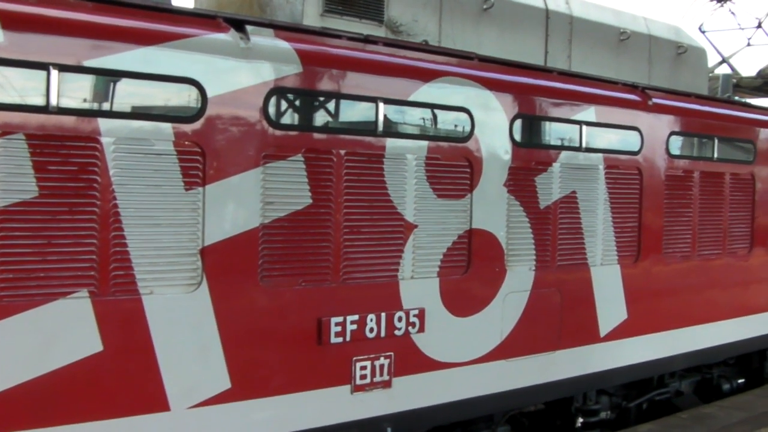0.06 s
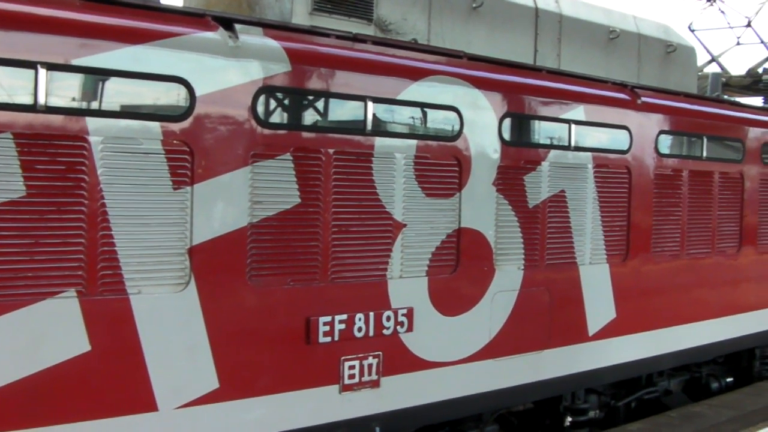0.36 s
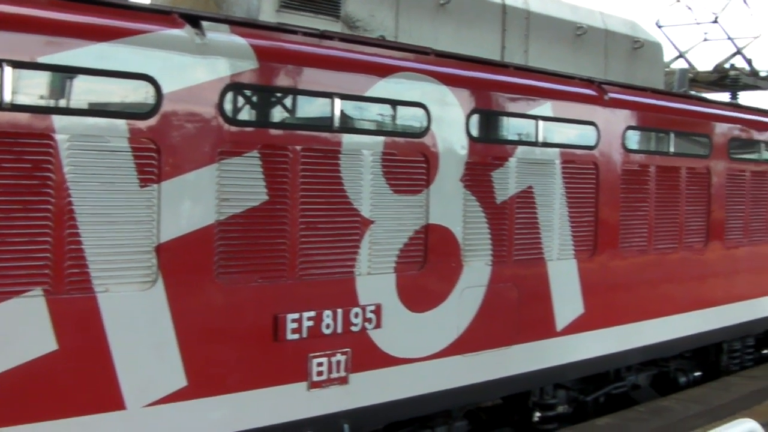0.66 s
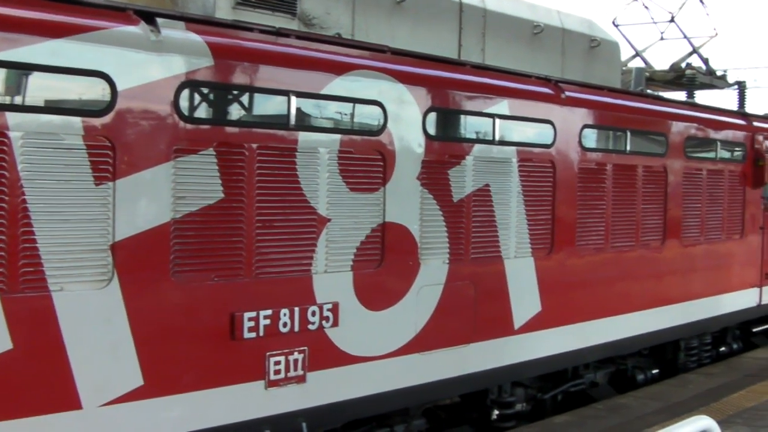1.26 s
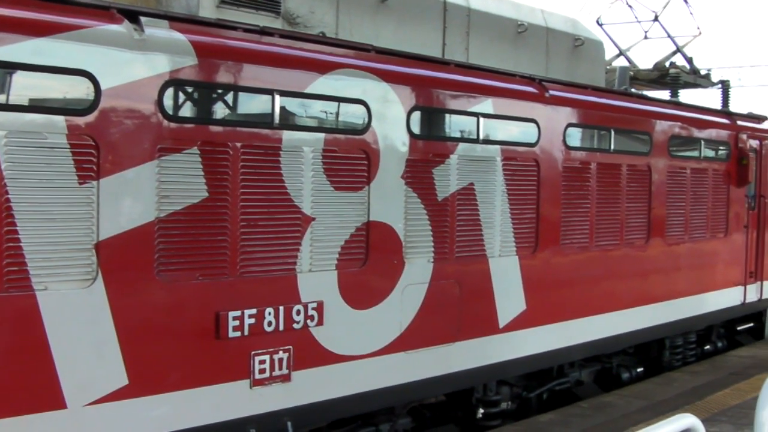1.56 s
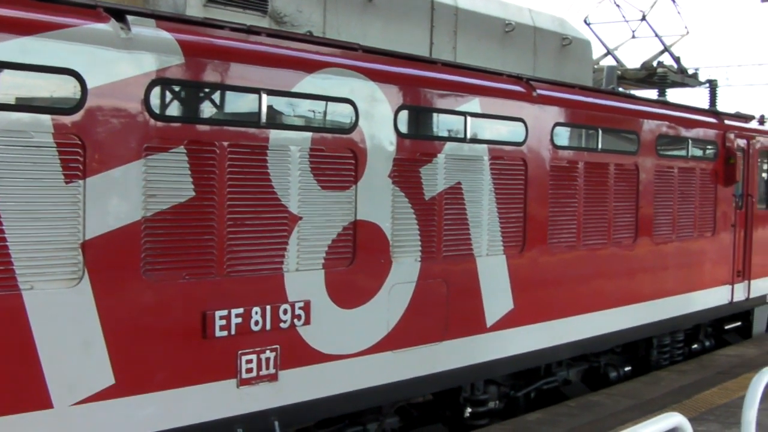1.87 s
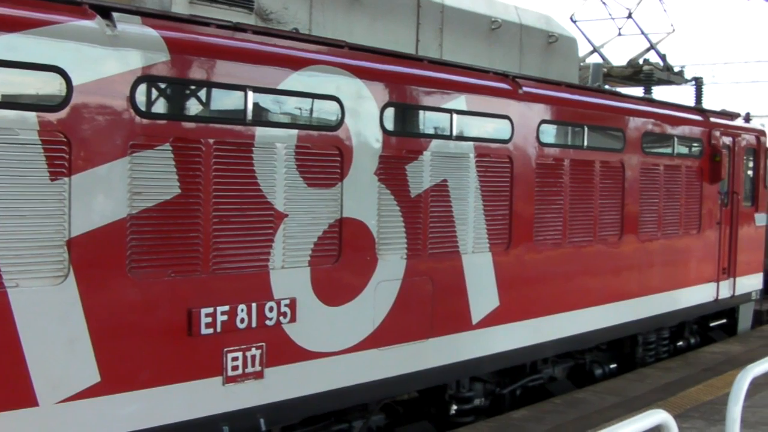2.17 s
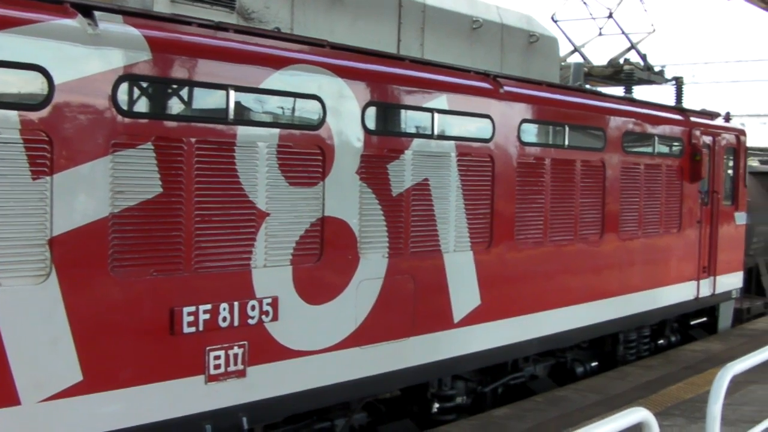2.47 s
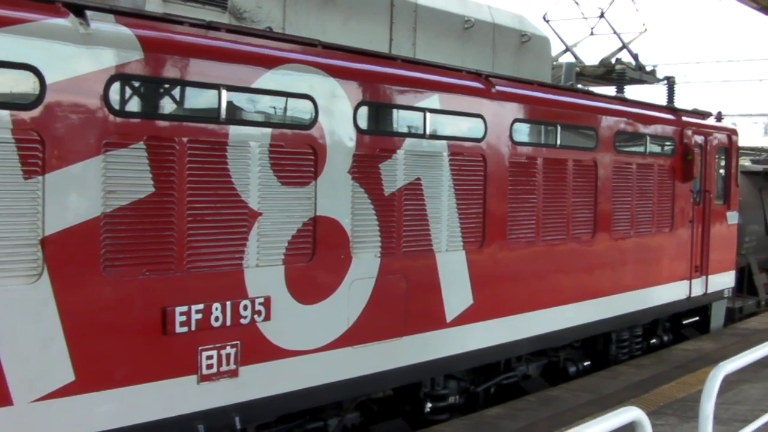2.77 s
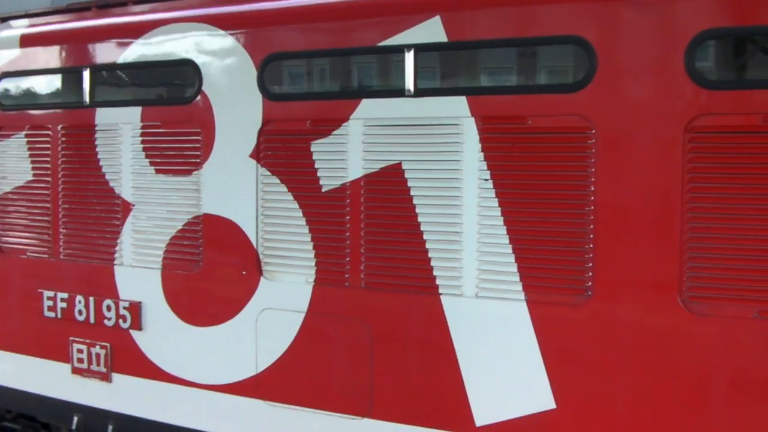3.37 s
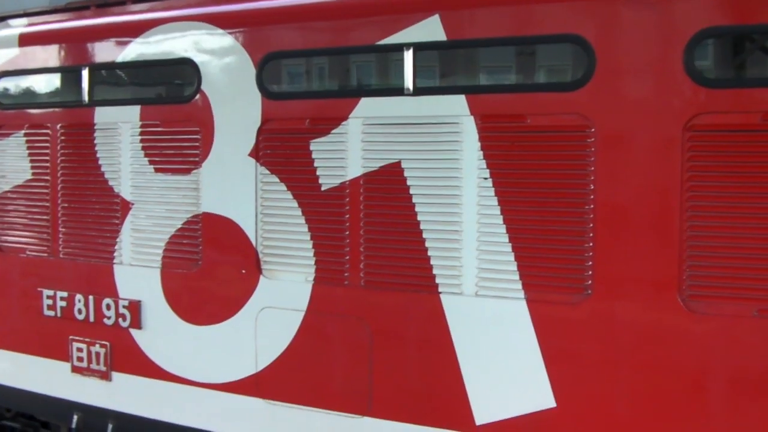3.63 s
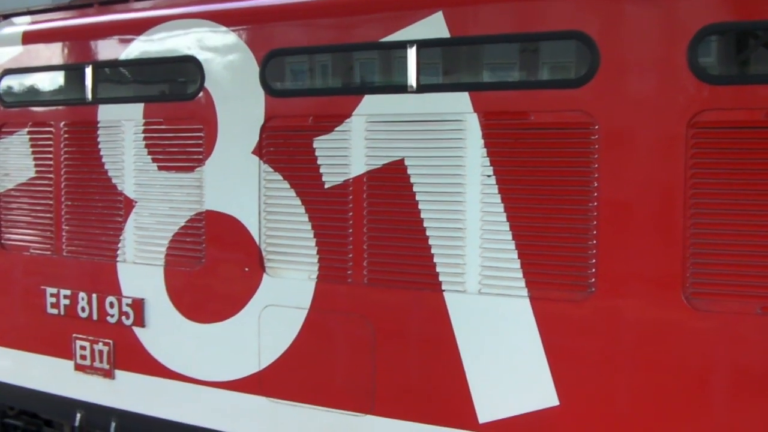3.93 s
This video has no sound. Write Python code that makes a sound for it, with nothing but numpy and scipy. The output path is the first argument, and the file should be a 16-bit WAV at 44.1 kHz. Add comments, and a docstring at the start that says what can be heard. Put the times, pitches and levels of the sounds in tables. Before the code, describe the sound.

A standing electric locomotive's cooling fans hum and rush, with one short hiss of air.

```python
"""At a station platform, an electric locomotive stands with its cooling blowers running.
The fans hum on a few tones. Their air rushes through ringing ducts and louvres (slatted vents)
and swells gently about twice a second. Compressed air hisses once from a valve. The sound drops
out for an instant and resumes nearer the louvres, with less hum and more rush."""
import sys
import numpy as np
from scipy.fft import rfft, irfft
from scipy.io import wavfile

SR = 44100
rng = np.random.default_rng(int(sys.argv[2]) if len(sys.argv) > 2 else 0)


def to_wav(s):
    """Save 16-bit WAV."""
    ch = np.atleast_2d(s).T  # columns
    pcm = np.round(np.clip(ch, -1, 1) * 32767)  # PCM
    wavfile.write(sys.argv[1], SR, pcm.astype(np.int16))


N = 176400
T = np.arange(N) / SR
HZ = np.maximum(np.arange(N // 2 + 1) * SR / N, 1)
PLATFORM, LOUVRES = 0, 1   # the two listening places

# How alike the two ears hear moving air, from 1 (the same) to -1 (opposite):
# (frequency [Hz], likeness on the platform [-1 to 1], likeness at the louvres [-1 to 1])
EAR_LIKENESS = [(40, 0.9, 0.96), (350, 0.98, 0.97), (1000, 0.95, .97), (2100, 0.9, 0.91),
                (3500, 0.71, 0.65), (5000, .52, .33), (7000, 0.22, -.05), (12000, .02, -0.71)]


def blower_hum(place):
    """Spinning fans and motors hum: one main tone, which wavers on the platform, and several others."""
    # The main tone as heard on the platform: (time [s], level [dB])
    main_levels = [(0.0, -15.5), (0.02, -10.5), (0.17, -16), (0.44, -10), (0.72, -14.5), (1.07, -10.5),
                   (1.26, -16.5), (1.48, -10.5), (1.84, -14.5), (2.04, -11), (2.42, -14), (2.77, -10.5),
                   (2.83, -15.5), (2.94, -14.5), (2.98, -17.5), (3.03, -12)]
    # The other tones: (pitch [Hz], platform level [dB], louvre level [dB], flutter [share of the tone])
    other_tones = [(86.2, -48, -45, 0.45), (172.3, -42.5, -45, 0.63), (598.8, -23.5, -23.5, .11),
                   (753.6, -25.5, -33, .14), (768.5, -38, -30, 0.89), (1157, -40.5, -35, .7),
                   (1510, -41.5, -48, .5), (1898, -42, -39, 0.69), (3280, -52, -46, 0.45)]
    seconds, level_db = np.transpose(main_levels)
    main_db = np.interp(T, seconds, level_db) if place == PLATFORM else -22.5
    hum = from_db(main_db) * wavering_tone(hz=377, flutter=0.043)
    for hz, *levels_db, flutter in other_tones:
        hum += from_db(levels_db[place]) * wavering_tone(hz, flutter)
    return hum


def air_rush(place):
    """Swirling air makes the ducts ring; its octaves swell together and each flickers on its own."""
    # The rushing air: (frequency [Hz], platform level [dB per Hz], louvre level [dB per Hz])
    rush_levels = [(22, -80.5, -82), (40, -73.5, -70), (79.6, -56, -54.5), (124, -57, -51), (279, -57, -54),
                   (325, -47, -45.5), (490, -47.5, -45.5), (576, -51.5, -46), (807, -51.5, -52.5),
                   (960, -57, -53), (1380, -54.5, -53), (1750, -57.5, -57), (3190, -62, -60),
                   (5000, -69, -69), (7000, -79.5, -74.5), (10000, -87, -84.5), (12300, -91.5, -92),
                   (15400, -99, -103)]
    # Where the ducts ring: (pitch [Hz], width [Hz], platform boost [dB], louvre boost [dB])
    duct_rings = [(180, 29, 5.5, 5.5), (251, 14, 4.5, 3), (337, 32, 5, 4.5), (388, 30, 3.5, 4.5),
                  (457, 19, 6, 1.5), (756, 52, 5, 7.5), (1131, 100, 3, 6), (1297, 76, 4.5, 2.5),
                  (1670, 78, 2, 0.5), (2130, 52, 5.5, 2.5), (2720, 37, 3, 2)]
    # How far the level swings up and down with each swell: (frequency [Hz], swing [dB])
    swell_depths = [(300, 0.1), (700, 0.2), (1300, 0.7), (2500, 0.25), (6000, 0.5), (12000, 0.4)]
    ringing_db = sum(boosts[place] * resonance(hz, width) for hz, width, *boosts in duct_rings)
    colour_db = at_hz(rush_levels, HZ, place + 1) + ringing_db
    air = stereo_noise(colour_db, at_hz(EAR_LIKENESS, HZ, place + 1))
    swell_peak_s, swell_period_s = 0.28, 0.53
    swell = np.cos(2 * np.pi * (T - swell_peak_s) / swell_period_s)
    surge_db = np.exp(-((T - 1.854) / 0.086) ** 2)   # one brief extra push of 1 dB
    gust_db = 0.36 * drift(per_s=2) + surge_db
    rush = 0
    for centre_hz in 20 * 2. ** np.arange(11):
        band = np.maximum(1 - abs(np.log2(HZ / centre_hz)), 0)
        swell_db = at_hz(swell_depths, centre_hz) * swell
        flicker_db = 0.52 * drift(per_s=17)
        rush += irfft(air * band, N) * from_db(swell_db + gust_db + flicker_db)
    return rush


def air_valve():
    """Compressed air escapes through a narrow opening: a short, ringing hiss grows, then shuts off."""
    # The escaping air at its strongest: (frequency [Hz], level [dB per Hz])
    hiss_levels = [(3000, -82), (4300, -71), (5600, -70), (6800, -88), (8800, -81), (11000, -82),
                   (13000, -85), (15500, -90)]
    # Where the opening rings: (pitch [Hz], width [Hz], boost [dB])
    valve_rings = [(4680, 280, 12.5), (5630, 300, 7), (8800, 260, 9), (10000, 260, 9), (11750, 250, 7),
                   (12600, 300, 7), (13100, 300, 7), (14750, 400, 7)]
    open_s, attack_s, shut_s, release_s, rise_db_per_s = 0.528, 0.02, 0.775, 0.028, 20
    opening = ramp(open_s, open_s + attack_s)
    growth = from_db(rise_db_per_s * np.minimum(T - shut_s, 0))
    closing = np.exp(-np.maximum(T - shut_s, 0) / release_s)
    ringing_db = sum(boost * resonance(hz, width) for hz, width, boost in valve_rings)
    air = stereo_noise(at_hz(hiss_levels, HZ) + ringing_db, at_hz(EAR_LIKENESS, HZ))
    return irfft(air, N) * opening * growth * closing


def wavering_tone(hz, flutter, flutter_per_s=4.7):
    """A tone of average power 1; its pitch wanders slightly and its level and phase tremble."""
    pitch_hz = hz + 0.35 * drift(per_s=2.4)
    phase = 2 * np.pi * np.cumsum(pitch_hz) / SR + rng.uniform(0, 2 * np.pi)
    tone = (1 + flutter * drift(flutter_per_s)) * np.cos(phase)
    tone += flutter * drift(flutter_per_s) * np.sin(phase)
    return tone / tone.std()


def stereo_noise(db_per_hz, likeness):
    """The spectrum of noise for two ears: a shared part plus a part that sets them apart."""
    shared, apart = rfft(rng.standard_normal((2, N)))
    apart *= np.sqrt((1 - likeness) / (1 + likeness))
    return np.array([shared + apart, shared - apart]) * from_db(db_per_hz) * np.sqrt(SR / 2)


def two_ears(sound, lag_s):
    """The right ear hears the sound a little later and, at most pitches, a little louder."""
    # The balance between the ears: (frequency [Hz], left minus right [dB])
    ear_balance = [(80, -2), (380, -1.65), (2000, -1.5), (3500, 0.1), (12000, -1)]
    left_gain = from_db(at_hz(ear_balance, HZ) / 2)
    delay = np.exp(-2j * np.pi * HZ * lag_s)
    return irfft(rfft(sound) * np.array([left_gain, delay / left_gain]), N)


def drift(per_s):
    """A smooth random wobble of typical size 1; a higher per_s makes it quicker."""
    smoothing = (HZ > 1) / (1 + (HZ / per_s) ** 2)
    wobble = irfft(rfft(rng.standard_normal(N)) * smoothing, N)
    return wobble / wobble.std()


def resonance(hz, width):
    """A bump of height 1 around the pitch at which something rings."""
    return 1 / (1 + (2 * (HZ - hz) / width) ** 2)


def at_hz(table, hz, column=1):
    """Look up a frequency in a table, sliding between rows with every octave equally wide."""
    rows = np.array(table)
    return np.interp(np.log(hz), np.log(rows[:, 0]), rows[:, column])


def ramp(start_s, end_s):
    """A straight rise from 0 to 1 between two times."""
    return np.clip((T - start_s) / (end_s - start_s), 0, 1)


def from_db(db):
    """Turn decibels into a number to multiply the sound by."""
    return 10 ** (np.asarray(db) / 20)


def scene():
    """The locomotive heard from the platform, then, after a brief dropout, near the louvres."""
    platform = two_ears(blower_hum(PLATFORM) + air_rush(PLATFORM) + air_valve(), lag_s=2.7e-5)
    louvres = two_ears(blower_hum(LOUVRES) + air_rush(LOUVRES), lag_s=1.3e-5)
    fade_s, gone_s, resume_s = 3.047, 3.061, 3.0812
    leaving = 1 - ramp(fade_s, gone_s)
    faint_lead_in = from_db(-19) * ramp(fade_s, resume_s)
    arriving = np.maximum(faint_lead_in, ramp(resume_s, resume_s + 0.003))
    return platform * leaving + louvres * arriving


def record(dry):
    """The microphone adds a faint whine and hiss; peaks are limited and the highest treble is cut."""
    whine = from_db(-58) * wavering_tone(hz=11653, flutter=0.43, flutter_per_s=10)
    hiss = from_db(-53) * rng.standard_normal((2, N))
    limited = np.clip(dry + whine + hiss, -1, 1)
    treble_cut = 1 / np.sqrt(1 + (HZ / 15600) ** 200)
    return irfft(rfft(limited) * treble_cut, N)


dry = scene()
out = record(dry)
to_wav(out)
```